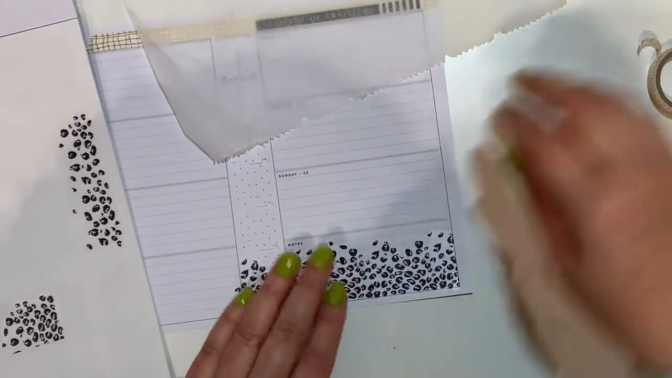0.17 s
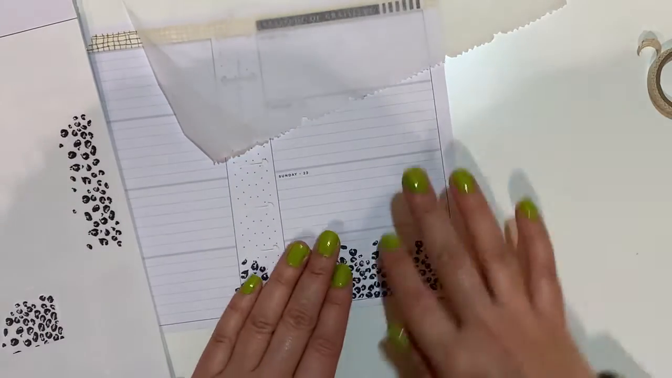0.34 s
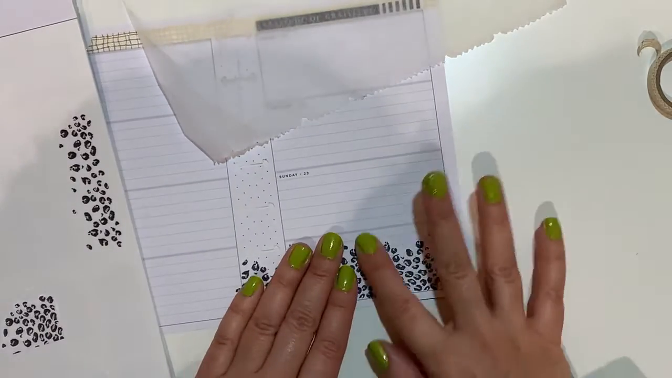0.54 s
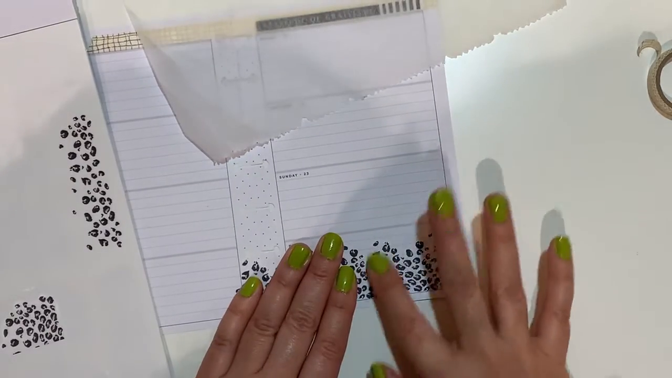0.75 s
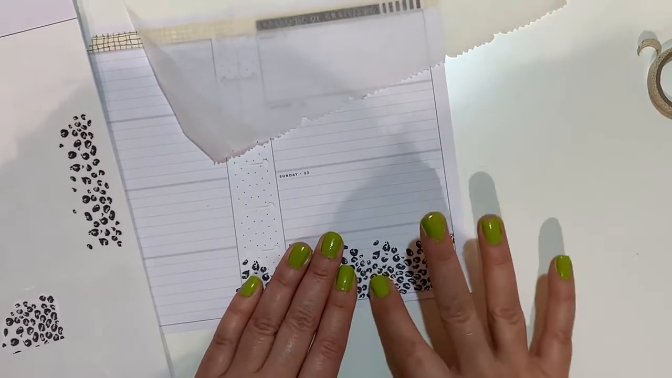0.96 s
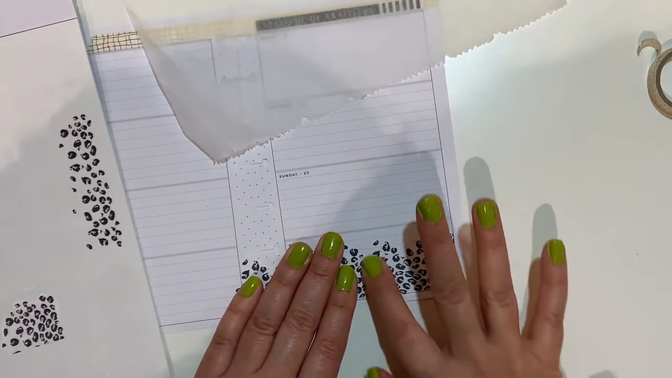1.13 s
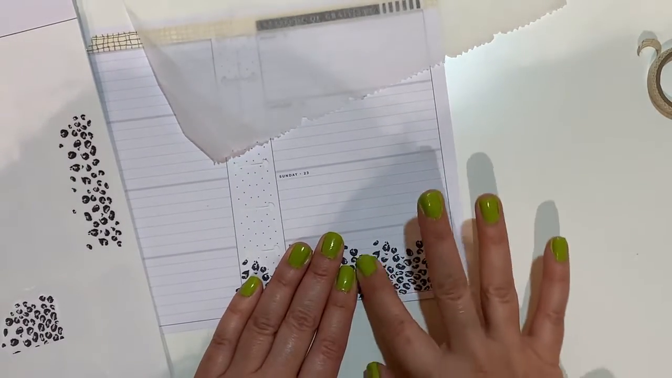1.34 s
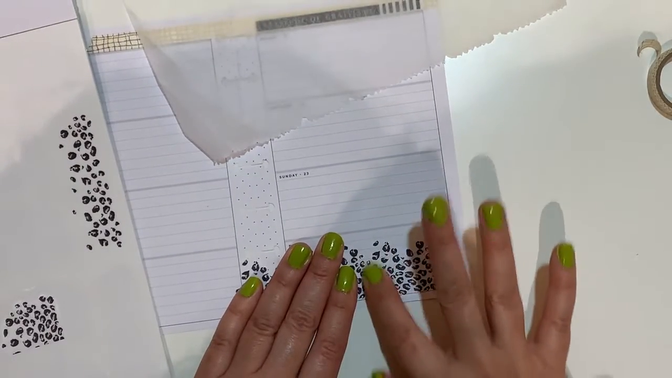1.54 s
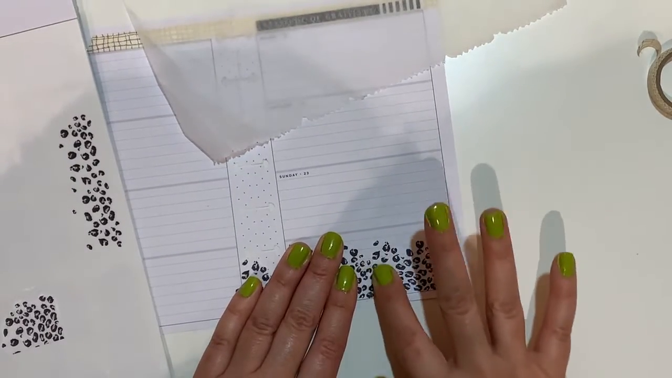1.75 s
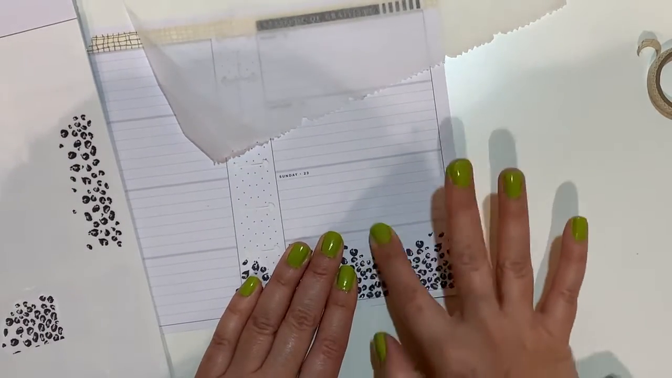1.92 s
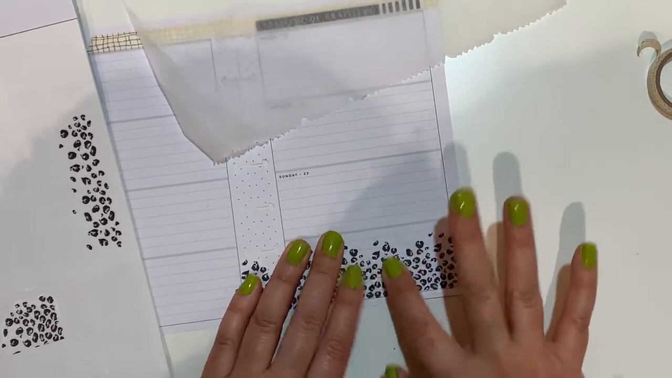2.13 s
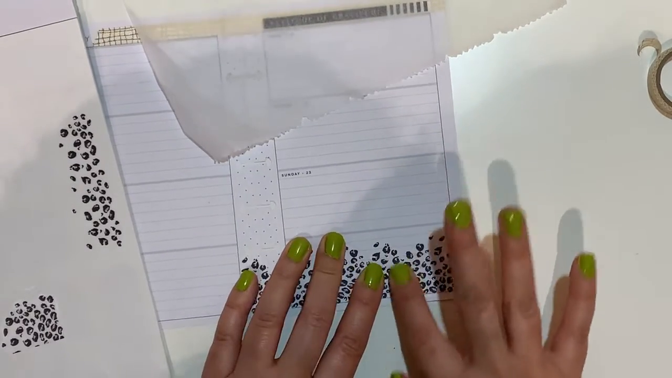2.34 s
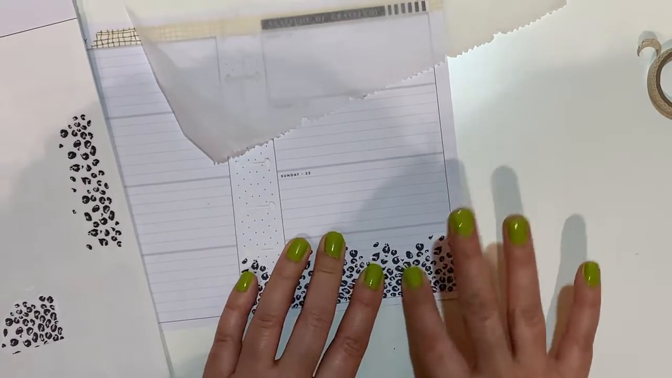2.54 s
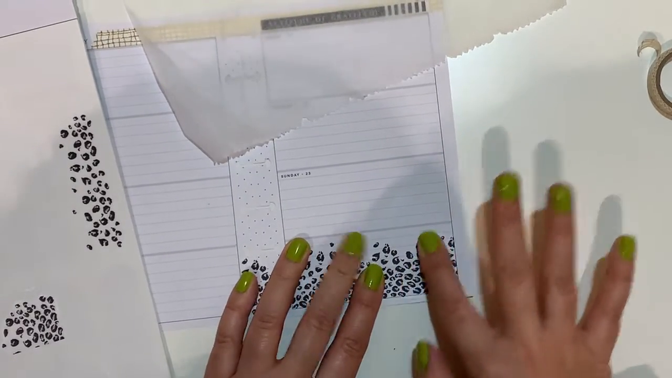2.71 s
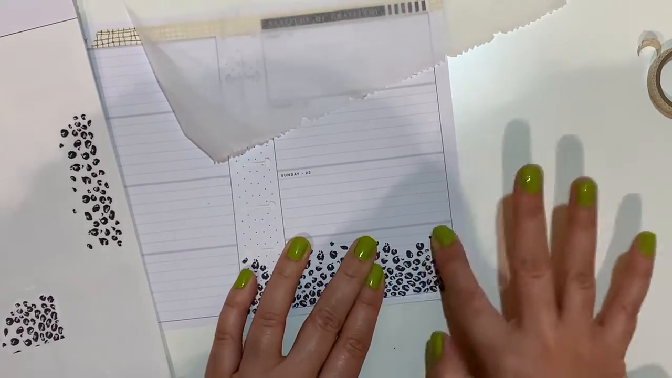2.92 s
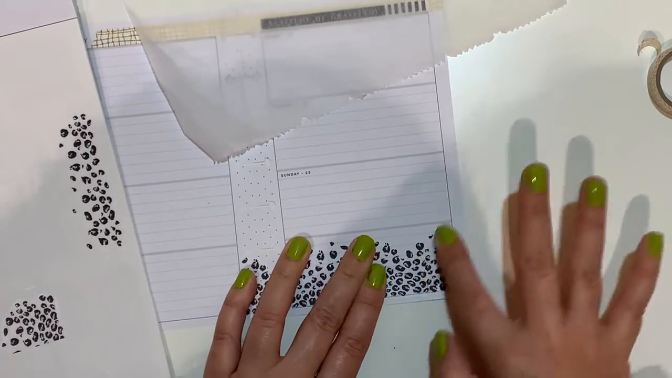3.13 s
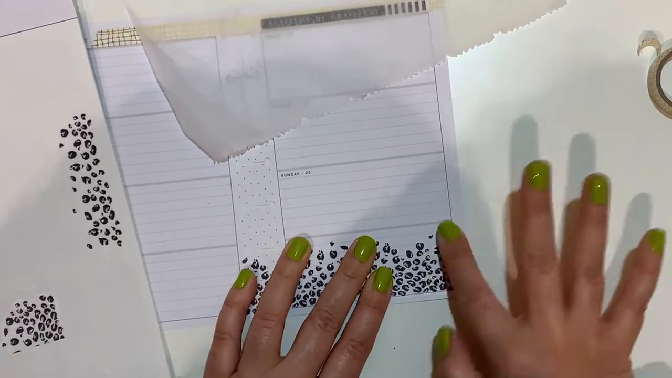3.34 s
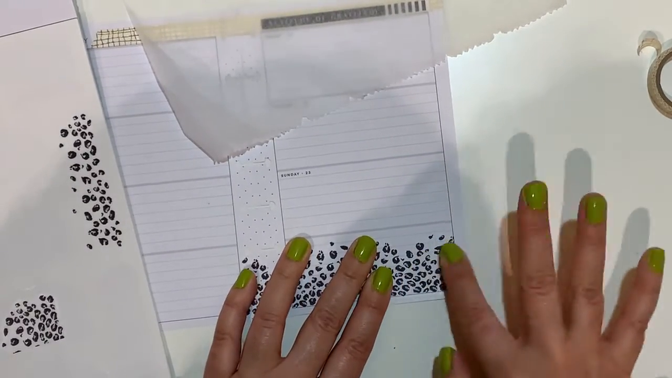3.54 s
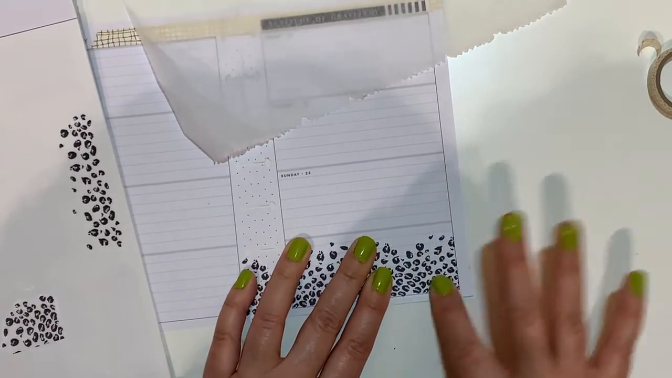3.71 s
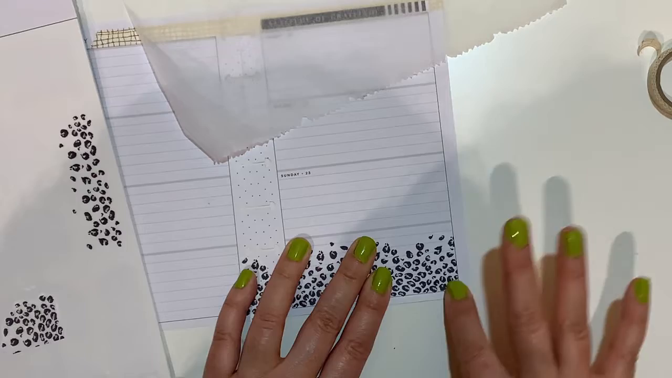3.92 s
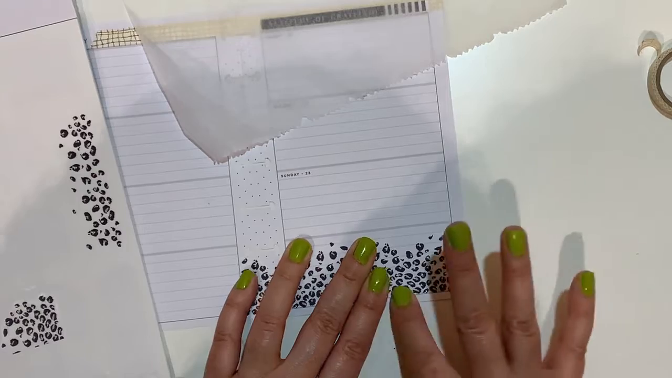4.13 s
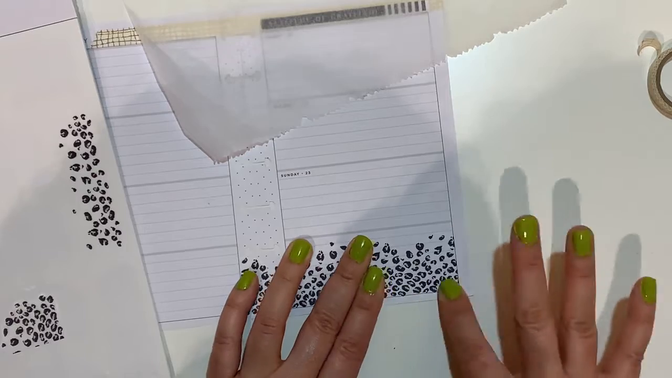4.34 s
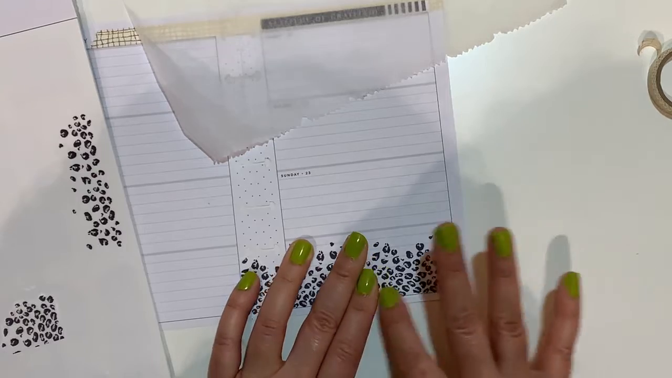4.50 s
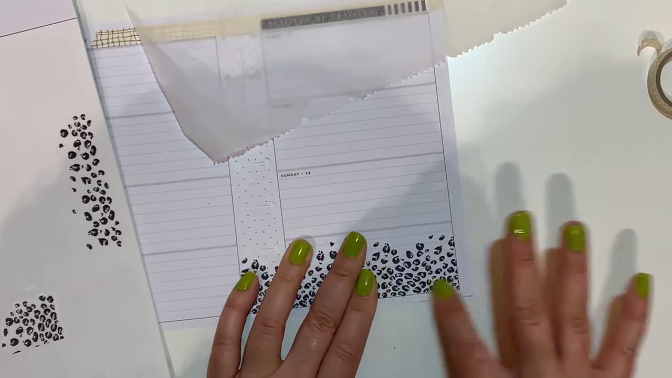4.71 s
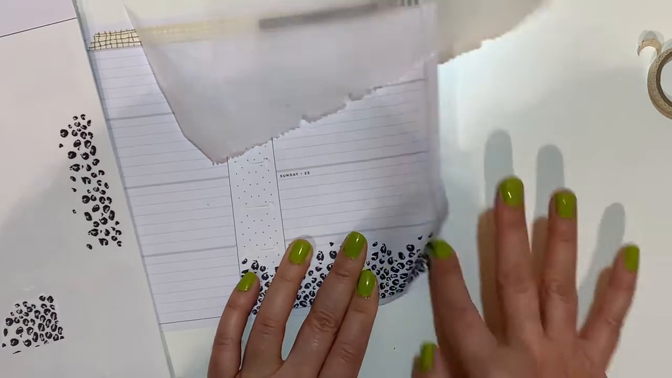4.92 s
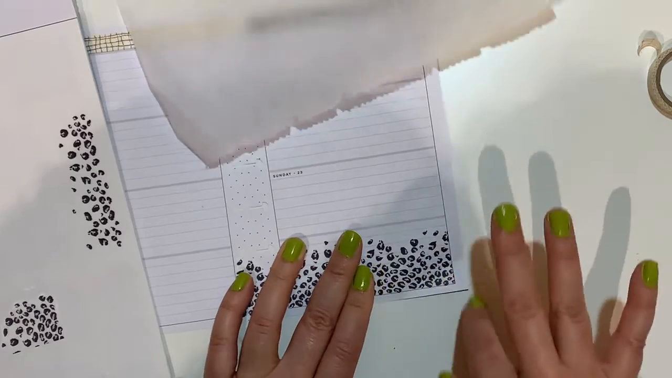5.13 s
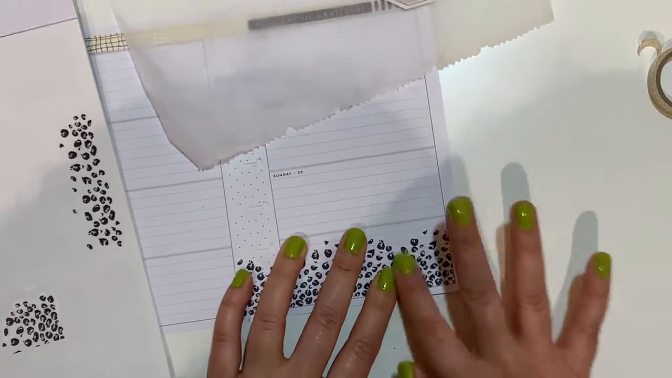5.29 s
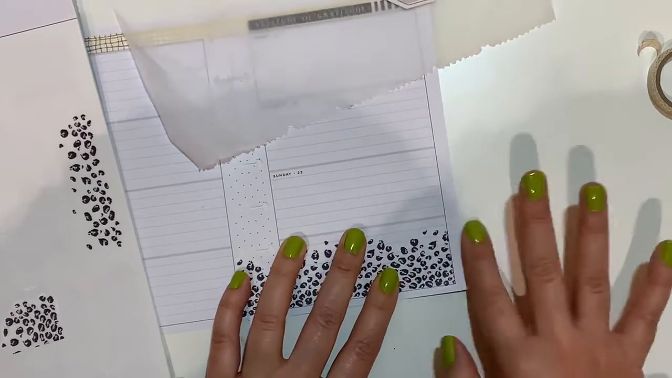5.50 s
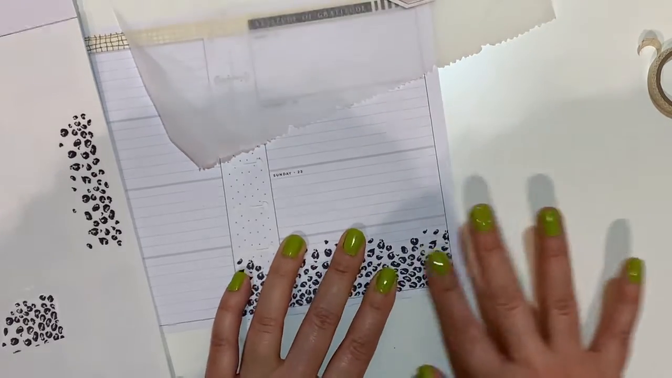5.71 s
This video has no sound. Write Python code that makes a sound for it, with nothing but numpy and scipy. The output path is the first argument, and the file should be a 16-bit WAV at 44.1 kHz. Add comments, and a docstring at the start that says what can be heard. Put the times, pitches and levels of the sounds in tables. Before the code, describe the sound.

A quiet, small-sounding room with a faint low hush, heard close in stereo. In the first half second a paper page rustles lightly, a few tiny creases pop, and a hand lands softly. From 0.5 to 3.9 s fingertips rub a sticker flat, to and fro about four times a second: thin, airy skin hiss, soft low desk thumps on the pushes, hollow rustles and small pops at the turns. Around 2.8 and 3.1 s the finger catches and judders in short rows of dry clicks. From 4.0 to 4.8 s come slower, separate one-way strokes, starting with a dull bump. At about 4.85 to 5.1 s a much louder, bright rasping swipe buckles the page with a sharp crack, followed by small crackles rising in pitch until 5.2 s. Dull resonant thumps with tiny nail ticks fall near 5.25 and 5.65 s, between the last soft strokes, ending around 5.8 s.

```python
"""In a hushed room the page of a paper pad on a desk rustles and a few creases pop.
Fingertips then rub a sticker flat: filtered noise hisses to and fro, pushes thump the desk, turns rustle the page.
Midway the finger judders twice, as rows of clicks that ring the pad; slower one-way strokes of hiss follow.
Near the end a loud swipe of shaped noise buckles the page, which crackles in noise bursts that rise in pitch.
It drops back with dull, resonant thumps between the last soft strokes."""
import sys
import numpy as np
from scipy import signal
from scipy.fft import rfft, irfft
from scipy.io import wavfile

SR = 44100
rng = np.random.default_rng(int(sys.argv[2]) if len(sys.argv) > 2 else 0)


def persist_wave(psi):
    """Save psi, clipped to +-1, as 16-bit WAV."""
    counts = np.round(np.clip(psi, -1, 1) * 32767).astype(np.int16)
    wavfile.write(sys.argv[1], SR, np.atleast_2d(counts).T)


N = 253971  # length [samples]

# All levels are cue levels: the layers that play them add their own trims.
# fingers rub outwards, landing on the desk: (time [s], skin hiss [dB], press [dB])
PUSHES = [(0.495, -66, -69), (0.74, -62, -40), (1.009, -72, -39.5), (1.276, -70.5, -36),
          (1.535, -65, -35.5), (1.822, -65.5, -35.5), (2.123, -62.5, -36), (2.39, -65, -39),
          (2.624, -64.5, -37), (2.861, -64.5, -38), (3.084, -66, -39.5), (3.3, -68.5, -46),
          (3.518, -66, -44.5), (3.741, -72, -44.5)]
# they turn and rub back, dragging the page: (time [s], length [s], skin hiss [dB], page rustle [dB])
RETURNS = [(0.604, 0.1, -59.5, -64), (0.844, 0.122, -62, -66.5), (1.105, 0.13, -69, -58.5),
           (1.396, 0.1, -68, -76.5), (1.665, 0.12, -66, -61), (1.964, 0.12, -63, -64),
           (2.204, 0.14, -61, -58), (2.491, 0.098, -63, -70.5), (2.733, 0.1, -64, -71.5),
           (2.962, 0.095, -66, -73), (3.192, 0.085, -66.5, -94), (3.387, 0.092, -62.5, -71.5),
           (3.594, 0.1, -64.5, -92), (3.818, 0.077, -81, -83.5)]
# slower one-way strokes: (start [s], end [s], skin hiss [dB], paper rasp [dB])
SMOOTHINGS = [(4.0, 4.105, -64.5, -69), (4.25, 4.37, -66.5, -67), (4.446, 4.57, -64, -72),
              (4.635, 4.803, -65.5, -66.5), (5.289, 5.335, -69, -69), (5.352, 5.54, -60.5, -67.5),
              (5.692, 5.8, -61.5, -68.5)]
# more rustles of the page, under the moving hands and between rubs:
# (start [s], end [s], hollow rustle [dB], crinkle [dB])
RUSTLES = [(0.18, 0.3, -56.5, -68.5), (0.33, 0.66, -80, -76), (0.68, 0.8, -59, -81),
           (1.21, 1.29, -64.5, -90), (1.75, 1.95, -61.5, -101), (2.245, 2.32, -82, -64.5),
           (3.989, 4.04, -64.5, -85), (4.38, 4.52, -80, -107), (4.555, 4.63, -68.5, -82),
           (5.098, 5.21, -61.5, -94), (5.612, 5.73, -58, -76.5)]
# the loud swipe: (time [s], treble hiss [dB], midrange rasp [dB], hollow lows [dB])
SWIPE = [(4.83, -96, -83, -72), (4.858, -51, -53.5, -79), (4.876, -50.5, -47.5, -87),
         (4.926, -43.5, -43.5, -65), (4.956, -54, -43.5, -50), (4.972, -49.5, -35.5, -52),
         (4.986, -58, -42, -62), (5.014, -47.5, -47.5, -65), (5.032, -48, -46.5, -58),
         (5.086, -76, -79, -69), (5.1, -77, -54.5, -73)]
# a hand or the page drops on the pad: (time [s], desk thump [dB], pad knock [dB])
DROPS = [(0.408, -41, -70), (3.987, -38.5, -46.5), (4.3, -48.5, -59), (4.842, -49.5, -61),
         (4.982, -44.5, -56), (5.225, -45, -67), (5.257, -30, -52), (5.296, -30.5, -55.5),
         (5.645, -24.5, -59)]
# the finger catches and slips: (start [s], length [s], level [dB], first slip rate [1/s], gap growth [0-1])
JUDDERS = [(2.813, 0.19, -41.5, 175, 0.1), (3.086, 0.097, -46.5, 48, 0.03)]
# single creases pop: (time [s], level [dB], pitch [Hz])
SNAPS = [(0.055, -55, 1980), (0.1388, -51.5, 1980), (0.1702, -45.5, 2300), (0.34, -47, 1800),
         (0.4636, -47, 1900), (4.9292, -21.5, 2640), (4.9668, -45, 2280)]
# a fingernail touches down: (time [s], level [dB])
NAILS = [(0.1706, -55), (5.256, -39.5), (5.6428, -43.5)]
# resonances of the knocked pad: (frequency [Hz], level [dB], 60 dB decay [s])
PAD_MODES = [(207, -3.5, 0.062), (319.5, -8.5, 0.06), (420, -6.5, 0.026), (626, -9, 0.058),
             (965, -1.5, 0.039), (1060, -4, 0.012), (1506, -4.5, 0.015), (1800, -8.5, 0.0097),
             (2307, -9, 0.017), (2610, -12.5, 0.012), (3800, -14, 0.022)]
# resonances of the desk as it sways after a push: (frequency [Hz], level [dB], 60 dB decay [s])
DESK_MODES = [(63.1, -16, 0.66), (88.7, -9.5, 0.24), (120.5, -37, 0.23), (182.9, -18, 0.17)]
# colour of skin hissing on paper: (frequency [Hz], relative level [dB])
SKIN_COLOUR = [(1500, -17), (4000, -20.5), (6500, -11.5), (8500, -7.5), (10500, -4), (12300, 1.5),
               (14000, -5), (16000, -10.5)]
# colour of rasping paper: (frequency [Hz], relative level [dB])
RASP_COLOUR = [(300, -33.5), (700, -9.5), (950, 1), (1250, -6), (1800, -3), (2350, 2.5), (3000, 0.5),
               (4200, -1.5), (6000, -8.5), (9000, -8.5), (16000, -21)]
# colour of the swipe's treble: (frequency [Hz], relative level [dB])
SWIPE_HISS_COLOUR = [(2000, -18), (4500, -8), (7000, -6), (9000, -3.5), (10500, -3), (12500, 0.5),
                     (14000, -5), (16000, -9.5)]
# colour of the air under the sheet: (frequency [Hz], relative level [dB])
HOLLOW_COLOUR = [(90, 2.5), (180, -4), (270, -2.5), (480, -1.5), (650, -6), (850, -8.5), (1300, -14.5),
                 (2200, -19.5), (5000, -52)]
# colour of fine crinkling: (frequency [Hz], relative level [dB])
CRINKLE_COLOUR = [(500, 17), (1000, -10), (1800, 1), (2400, 9), (3600, 6), (5000, -0.5), (8000, -22),
                  (16000, -76)]
# colour of the room's hush: (frequency [Hz], relative level [dB])
ROOM_COLOUR = [(20, -36), (45, 3.5), (65, -5), (110, 1), (250, -13), (700, -18), (1500, -17), (2500, -24.5),
               (6000, -31), (12000, -27), (16000, -35.5)]
# stereo image of the noises: (frequency [Hz], left-right likeness [-1 to 1])
LIKENESS = [(60, 0.94), (150, 0.91), (300, 0.93), (700, 0.27), (1400, 0.35), (2800, -0.1), (4500, 0.29),
            (7000, 0.032), (10000, 0.88), (13000, 0.68), (16000, -0.037)]

TURN_PAUSE_S = 0.0089  # the finger rests at the turn
# paper rasp of a rub; on the way back it follows this share of the swing in page rustle
RASP_DB, RASP_FOLLOWS = -71, 0.067
RUSTLE_S, CRINKLE_DB = 0.1, -7  # page shift at a turn: length, crinkle against rustle
THUMP_LAG_S = 0.0036  # the desk gives just after the finger lands
# a rub leans on the desk again as it brakes, sets off back and stops
BRAKE_LEAD_S, BRAKE_DB, SET_OFF_LAG_S, SET_OFF_DB, STOP_DB = 0.02, -9.5, 0.01585, 6, -12.5
SMOOTHING_PRESS_DB = -50  # soft thump as a one-way stroke starts
BUMP_DB = -11.0  # fingertip knock on the pad, against the press
JUDDER_JITTER, JUDDER_FADE_DB = 0.04, 11.5  # scatter of the gaps as a share; drop at both ends
PAD_CRACK_DB, PAD_ROOM_T60_S = 13, 0.15  # bare contact beside the ringing; decay of its tail
CREASE_DB, CREASE_HZ = 17.5, 2020  # pop that starts the shift at a turn: against the rustle, pitch
# the buckled page relaxes in a run of pops that rise in pitch
SETTLE_START_S, SETTLE_END_S, SETTLE_DB = 5.1, 5.221, -43
SETTLE_FROM_HZ, SETTLE_TO_HZ = 2370, 3560
ROOM_DB = -71.5
CUTOFF_HZ = 15950


def strokes():
    """Skin on paper: a smooth high hiss and a grainier rasp, both following the finger's speed."""
    hiss, rasp = gestures(stroke_moves(), peak_at=0.47, power=0.72)
    grip = from_db(drift(45))
    skin = from_db(3.0) * hiss * friction(SKIN_COLOUR, grain_db=0.4, grain_rate=230)
    paper = from_db(-0.5) * rasp * friction(RASP_COLOUR, grain_db=3.0, grain_rate=490)
    return grip * (skin + paper) * from_db(0.033 * np.array([[1], [-1]]))


def stroke_moves():
    """Pushes run up to their returns, then one-way strokes: (start [s], end [s], hiss [dB], rasp [dB])."""
    rows = []
    usual_rustle_db = np.mean([db for *_, db in RETURNS])
    for (start, push_db, _), (turn, length, return_db, rustle_db) in zip(PUSHES, RETURNS):
        return_rasp_db = RASP_DB + RASP_FOLLOWS * (rustle_db - usual_rustle_db)
        rows.append((start, turn - TURN_PAUSE_S, push_db, RASP_DB))
        rows.append((turn, turn + length, return_db, return_rasp_db))
    return rows + SMOOTHINGS


def swipe():
    """The hand drags hard across the page and lifts it into a buckle: three noises fade between cues."""
    times, *levels_db = np.transpose(SWIPE)
    t = np.arange(N) / SR
    hiss_db, rasp_db, hollow_db = [
        np.interp(t, times, db, left=-np.inf, right=-np.inf) for db in levels_db]
    hiss = from_db(hiss_db + 2.5) * friction(SWIPE_HISS_COLOUR, grain_db=1.0, grain_rate=610)
    rasp = from_db(rasp_db - 4.0) * friction(RASP_COLOUR, grain_db=2.5, grain_rate=520)
    rasp = rasp * from_db(0.67 * np.array([[-1], [1]]))  # leans right
    hollow = from_db(hollow_db - 2.5) * friction(HOLLOW_COLOUR, grain_db=6, grain_rate=250)
    return hiss + rasp + hollow


def rustles():
    """The sheet gives suddenly, then settles: a hollow sound from the air under it, and fine crinkles."""
    hollow, crinkle = gestures(page_shifts(), peak_at=0.05, power=0.91)
    air = from_db(3.0) * hollow * friction(HOLLOW_COLOUR, grain_db=0, grain_rate=140)
    creasing = from_db(4.5) * crinkle * friction(CRINKLE_COLOUR, grain_db=2.0, grain_rate=500)
    return air + creasing


def page_shifts():
    """The page rustles at each turn and at further cues: (start [s], end [s], hollow [dB], crinkle [dB])."""
    return RUSTLES + [(s, s + RUSTLE_S, db, db + CRINKLE_DB) for s, *_, db in RETURNS]


def thumps():
    """A soft push swells in the desk's main resonance and leaves a faint sway."""
    def swell(force):
        return band(band(force, 77.0, 109.0), 62, 186)
    push = clicks(presses())
    thud = swell(push) / np.abs(swell(signal.unit_impulse(SR // 10))).max()
    sway = sum(from_db(db) * ring(push, hz, t60) for hz, db, t60 in DESK_MODES)
    return (from_db(-0.5) * thud + band(sway, 27, 207)) * from_db(np.array([[1], [-1]]))


def presses():
    """Changes of motion push the desk, harder on the way back if the page drags: (time [s], level [dB])."""
    rows = [(s + THUMP_LAG_S, db) for s, db, _ in DROPS]
    for (start, _, db), (turn, length, _, rustle_db) in zip(PUSHES, RETURNS):
        rows.append((start + THUMP_LAG_S, db))
        rows.append((turn - BRAKE_LEAD_S, db + BRAKE_DB))
        rows.append((turn + SET_OFF_LAG_S, (db + rustle_db) / 2 + SET_OFF_DB))
        rows.append((turn + length, db + STOP_DB))
    return rows + [(start + THUMP_LAG_S, SMOOTHING_PRESS_DB) for start, *_ in SMOOTHINGS]


def knocks():
    """Dull bumps as the fingers land, and the thinner, brighter chatter of the juddering finger."""
    landing = pad(bumps(), scrape_t60=0.017, lowest_hz=115, hardness_hz=1180, wet_db=-4.5)
    chatter = pad(slips(), scrape_t60=0.014, lowest_hz=454, hardness_hz=2950, wet_db=-6.0)
    return from_db(-6.5) * landing + from_db(-9.5) * chatter


def bumps():
    """The pad is knocked by each push and each drop: (time [s], level [dB])."""
    return [(s, db + BUMP_DB) for s, _, db in PUSHES] + [(s, db) for s, _, db in DROPS]


def slips(count=20):
    """Stick and slip repeat ever more slowly, give or take jitter, in a swell: (time [s], level [dB])."""
    rows = []
    for start, length, db, rate, growth in JUDDERS:
        jitter = 1 + JUDDER_JITTER * rng.standard_normal(count)
        gaps = (1 + growth) ** np.arange(count) * jitter / rate
        ages = np.cumsum(gaps) - gaps
        for age in ages[ages < length]:
            rows.append((start + age, db - JUDDER_FADE_DB * (2 * age / length - 1) ** 2))
    return rows


def pad(rows, scrape_t60, lowest_hz, hardness_hz, wet_db):
    """Each contact is a click and a brief scrape that ring the pad; soft skin dulls the high modes."""
    fade = np.exp(-np.log(1000) / (scrape_t60 * SR))
    hits = clicks(rows)
    scrape = signal.lfilter([1], [1, -fade], hits + 1e-18) * rng.standard_normal(N)
    force = hits + 0.33 * scrape
    rung = sum(from_db(db) * (-1) ** k * ring(force, hz, t60)  # neighbouring modes in opposite polarity
               for k, (hz, db, t60) in enumerate(PAD_MODES))
    contact = band(rung + from_db(PAD_CRACK_DB) * force, lowest_hz, hardness_hz)
    return reflections(contact, wet_db=wet_db, t60=PAD_ROOM_T60_S)


def snaps():
    """Creases pop as noise bursts, each around its own pitch; nails tick more brightly."""
    pops = ticks = 0
    for s, db, hz in creases():
        crack = burst(s, t60=0.015)
        pop = band(crack, hz / 1.38, hz * 1.24) + 0.14 * band(crack, 920, 9800)
        pops = pops + from_db(db) * pop / np.abs(pop).max()
    for s, db in NAILS:
        tick = band(burst(s, t60=0.0064), 3700, 13100)
        ticks = ticks + from_db(db) * tick / np.abs(tick).max()
    return reflections(from_db(-10.5) * pops + from_db(0.5) * ticks, wet_db=1.5, t60=0.13)


def creases(count=6):
    """Single pops, one at each turn, and the page's uneven settling: (time [s], level [dB], pitch [Hz])."""
    times = np.linspace(SETTLE_START_S, SETTLE_END_S, count) + 0.0015 * rng.standard_normal(count)
    pitches = np.geomspace(SETTLE_FROM_HZ, SETTLE_TO_HZ, count)
    settling = [(s, SETTLE_DB, hz) for s, hz in zip(times, pitches)]
    return SNAPS + settling + [(s, db + CREASE_DB, CREASE_HZ) for s, *_, db in RETURNS]


def room_hush():
    """Steady coloured noise, the quiet bed of the room."""
    return from_db(ROOM_DB) * stereo(rng.standard_normal((2, N)), ROOM_COLOUR)


def reflections(x, wet_db, t60):
    """Desk top and walls add a short scattered tail, different at left and right."""
    t = np.arange(SR // 2) / SR
    tail = band(rng.standard_normal((2, len(t))), 303, 5200) * from_db(-60 * t / t60) * (t > .001)
    tail /= np.sqrt(np.sum(tail ** 2, axis=1, keepdims=True))  # unit energy
    return x + from_db(wet_db) * signal.fftconvolve(np.atleast_2d(x), tail, axes=1)[:, :N]


def friction(colour, grain_db, grain_rate):
    """Fibres catch and release: coloured stereo noise whose level wanders by grain_db, grain_rate per s."""
    grains = from_db(grain_db * np.clip(drift(grain_rate), -2, 2))
    return stereo(rng.standard_normal((2, N)) * grains, colour)


def stereo(white, colour):
    """Colour two unrelated noises and mix them into a partly alike left and right, each about rms 1."""
    mid, side = rfft(white) * from_db(per_bin(colour))
    alike = per_bin(LIKENESS)
    mid = irfft(mid * np.sqrt(1 + alike), N)
    side = irfft(side * np.sqrt(1 - alike), N)
    return np.array([mid + side, mid - side]) / np.std(mid)


def gestures(rows, peak_at, power):
    """Each move speeds up and slows like a half sine, fastest at the share peak_at; a gain per level."""
    t, out = np.arange(N) / SR, np.zeros((2, N))
    for start, end, *levels_db in rows:
        during = (t > start) & (t < end)
        progress = (t[during] - start) / (end - start)
        phase = np.interp(progress, [0, peak_at, 1], [0, np.pi / 2, np.pi])
        out[:, during] += from_db(levels_db)[:, None] * np.sin(phase) ** power
    return out


def burst(s, t60):
    """A crack of noise that starts at s and dies at once."""
    age = np.arange(SR // 16) / SR
    out, at = np.zeros(N + len(age)), round(s * SR)
    out[at:at + len(age)] = rng.standard_normal(len(age)) * from_db(-60 * age / t60)
    return out[:N]


def clicks(rows):
    """One click for each (time [s], level [dB]) row."""
    s, db = np.transpose(rows)
    out = np.zeros(N)
    out[np.round(s * SR).astype(int)] = from_db(db)
    return out


def ring(force, hz, t60):
    """A resonance: a unit click sets off a decaying sine that starts at height 1."""
    r, w = np.exp(-np.log(1000) / (t60 * SR)), 2 * np.pi * hz / SR
    return signal.lfilter([0, np.sin(w)], [1, -2 * r * np.cos(w), r * r], force + 1e-18)


def band(x, low_hz, high_hz):
    """Causal band-pass."""
    return signal.sosfilt(signal.butter(2, [low_hz, high_hz], "band", fs=SR, output="sos"), x + 1e-18)


def drift(rate):
    """Random wander with spread 1, heading for a new value rate times a second."""
    return np.interp(np.arange(N) * rate / SR, np.arange(N), rng.standard_normal(N)) * np.sqrt(3 / 2)


def per_bin(points):
    """Read a (frequency [Hz], value) table at every frequency bin."""
    hz, value = np.transpose(points)
    return np.interp(np.log(np.arange(N // 2 + 1) * SR / N + 1), np.log(hz), value)


def from_db(db):
    """Decibels to gain."""
    return 10 ** (np.asarray(db) / 20)


def scene():
    """Hands, paper and desk over the hush of the room."""
    paper = reflections(strokes() + rustles() + swipe(), wet_db=-10.0, t60=0.27)
    return paper + thumps() + knocks() + snaps() + room_hush()


def record(dry):
    """The top is cut steeply."""
    return signal.sosfilt(signal.ellip(12, .1, 80, CUTOFF_HZ, fs=SR, output="sos"), dry)


dry = scene()
out = record(dry)
persist_wave(out)
```